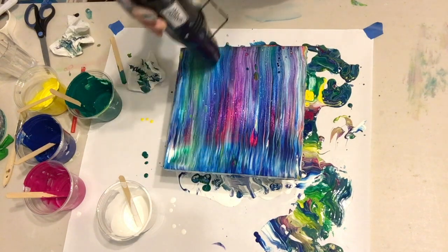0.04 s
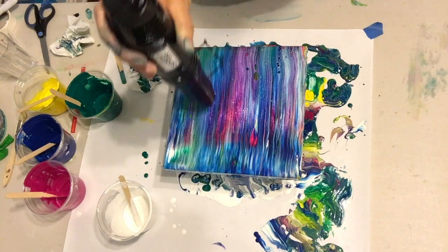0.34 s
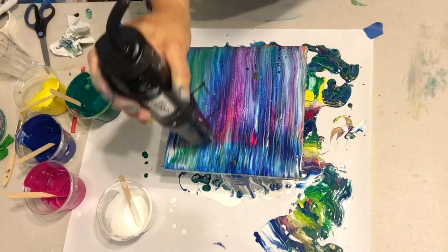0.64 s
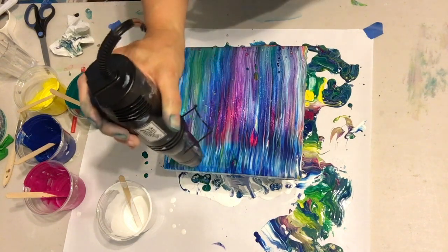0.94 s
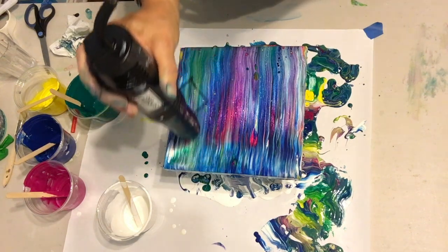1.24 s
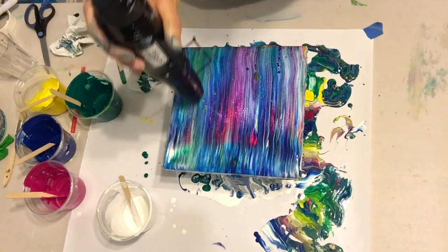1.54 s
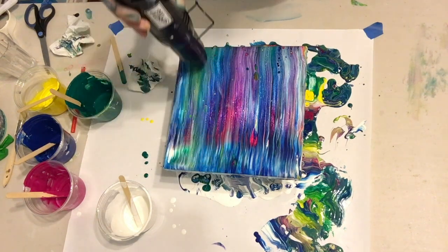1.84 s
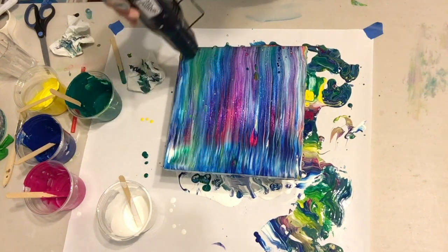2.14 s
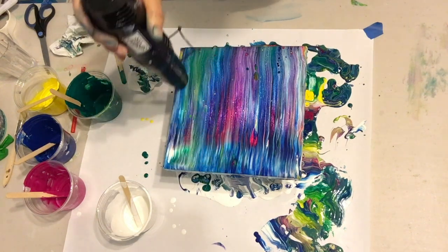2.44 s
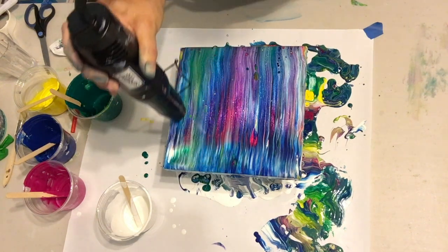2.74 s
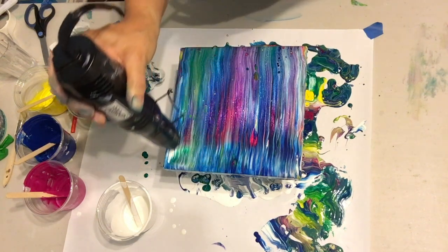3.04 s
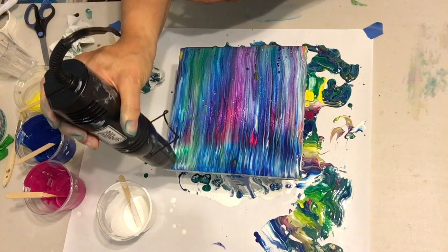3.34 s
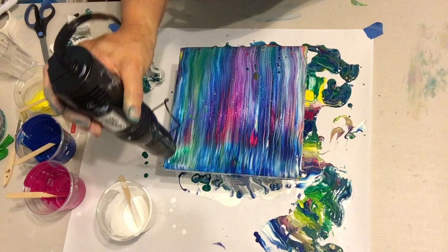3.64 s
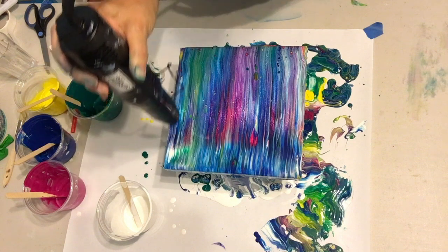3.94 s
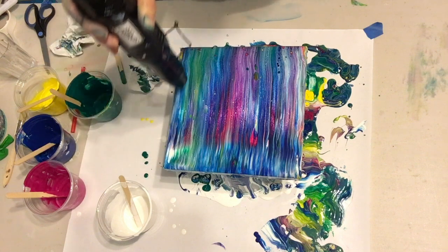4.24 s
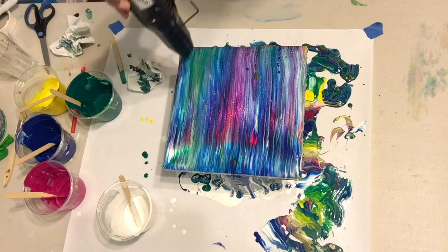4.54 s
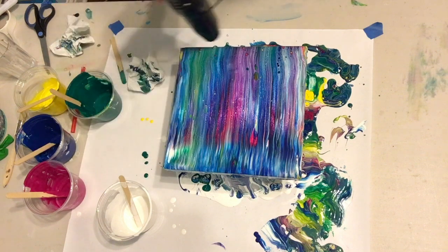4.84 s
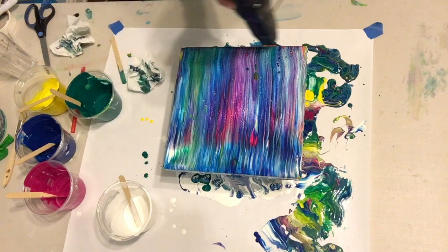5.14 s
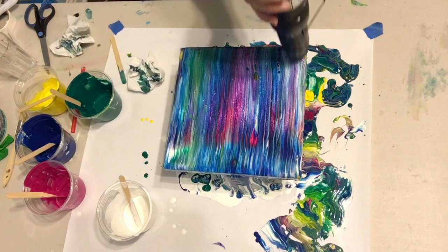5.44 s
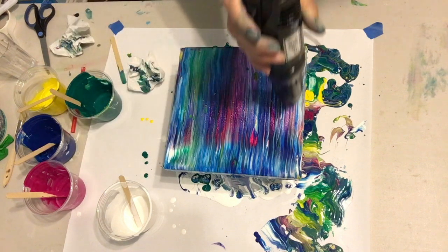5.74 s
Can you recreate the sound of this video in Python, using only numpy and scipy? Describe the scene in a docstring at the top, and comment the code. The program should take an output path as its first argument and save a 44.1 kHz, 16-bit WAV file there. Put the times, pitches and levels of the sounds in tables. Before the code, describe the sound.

A handheld heat gun blows steadily, a rush of hot air with a thin motor whine, shifting slightly as it sweeps around.

```python
"""A handheld heat gun blows steadily as it is swept back and forth over a wet painting on a table.
Its fan drives turbulent air through the resonant barrel and out of the nozzle; the small motor whines
at harmonics of its shaft rate. As the gun tilts, the hiss turns to and from a mono microphone,
and moving reflections off the table and canvas comb-filter the noise."""
import sys
import numpy as np
from scipy import signal
from scipy.fft import rfft, irfft, next_fast_len
from scipy.io import wavfile
from scipy.ndimage import map_coordinates

SR = 44100
rng = np.random.default_rng(int(sys.argv[2]) if len(sys.argv) > 2 else 0)


def persist_wave(psi):
    """Save psi, clipped to +-1, as 16-bit WAV."""
    counts = np.round(np.clip(psi, -1, 1) * 32767).astype(np.int16)
    wavfile.write(sys.argv[1], SR, np.atleast_2d(counts).T)


N = 255339

# gun position, drawn back when both shares are 0: time_s, over_canvas_share, beside_canvas_share
POSE = [(0, 0.076, 0.14), (.35, 0.38, 0.09), (.65, 0.82, 0.054), (1.25, 0.81, .05), (1.6, 0.27, 0.43),
        (2, 0.17, 0.058), (2.5, .05, 0.37), (2.9, .05, 0.58), (3.3, 0.056, 0.92), (3.9, .05, 0.93),
        (4.3, .05, .45), (4.6, 0.054, .05), (5, .02, .02), (5.35, 0.16, 0.09), (5.79, 0.41, 0.12)]


def amp(db):
    """Amplitude ratio: a factor of ten per 20 dB."""
    return 10 ** (np.asarray(db) / 20)


def unit(x):
    """Normalisation to rms 1."""
    return x / np.sqrt(np.mean(x ** 2) + 1e-20)


def curves(rows):
    """Linear interpolation in time: one value per sample for each column after the first."""
    time_s, *columns = np.transpose(rows)
    return [np.interp(np.arange(N) / SR, time_s, column) for column in columns]


def wobble(rate_hz):
    """Slow random modulation: a spline through Gaussian knots."""
    knots = rng.standard_normal(int(N * rate_hz / SR) + 4)
    return map_coordinates(knots, [np.arange(N) * rate_hz / SR])


def filtered(x, response):
    """Linear filtering: the spectrum is multiplied by a frequency response."""
    size = next_fast_len(N + SR // 2)
    return irfft(rfft(x, size) * response(np.fft.rfftfreq(size, 1 / SR)), size)[..., :N]


def aimed(drawn_back, *changes):
    """Linear blend: the drawn-back value plus changes over, beside and on the far side of the canvas."""
    # the crossing to the far side: time_s, far_share
    crossing = [(4.7, 0.084), (5.5, 1)]
    shares = curves(POSE) + curves(crossing)
    return drawn_back + sum(change * share for change, share in zip(changes, shares))


def directivity(aim_db, drift_db=0.25):
    """Directional radiation: gain follows the aim (back_db, then changes over_db, beside_db, far_db)."""
    return amp(aimed(*aim_db) + drift_db * wobble(5.16))


def turbulence(spectrum, resonances):
    """Resonant filtering: broadband noise of rms 1, with peaks and dips weighted by the gun's pose."""
    knot_hz, level_db = np.transpose(spectrum)
    over, beside = curves(POSE)
    noise, out = rng.standard_normal(N), 0
    for pose, share in enumerate([1 - over - beside, over, beside]):
        def response(hz):
            broad_db = np.interp(np.log(hz + 1), np.log(knot_hz + 1), level_db)
            lift_db = sum(lifts[pose] * .5 ** ((2 * (hz - centre) / width) ** 2)
                          for centre, width, *lifts in resonances)
            return amp(broad_db + lift_db)
        out = out + share * unit(filtered(noise, response))
    return unit(out)


def patchy(x, depth_db=0.88, patch_hz=520, patch_s=.3):
    """Spectral modulation: the colour of the hiss shifts in soft patches as the hand moves."""
    hz, t, spectra = signal.stft(x, SR, nperseg=512)
    knots = rng.standard_normal(size=(96, 96))
    grid = np.meshgrid(hz / patch_hz, t / patch_s, indexing="ij")
    patches_db = depth_db * map_coordinates(knots, grid, mode="mirror")
    return signal.istft(spectra * amp(patches_db), SR, nperseg=512)[1][:N]


def treble_opening(x, edge_hz=7600, muffled_db=-2.5, opens_at_s=.5, opening_s=.04):
    """Time-varying shelf filter: the top of the hiss is muffled at first, then opens."""
    closed = .5 - .5 * np.tanh((np.arange(N) / SR - opens_at_s) / opening_s)
    treble = filtered(x, lambda hz: 1 - 1 / (1 + (hz / edge_hz) ** 14))
    return x + (amp(muffled_db * closed) - 1) * treble


def room(x, t60_s=0.14, dull_hz=4500):
    """Reverberation: wall reflections merge into a short, dull, exponentially decaying tail."""
    t = np.arange(SR // 3) / SR
    tail = rng.standard_normal(len(t)) * amp(-60 * t / t60_s) * (t > .005)
    reverberation = signal.fftconvolve(x, tail / np.linalg.norm(tail))[:N]
    return filtered(reverberation, lambda hz: 1 / np.hypot(1, hz / dull_hz))


def reflection(x, delay_ms, gain):
    """Comb filtering: an echo whose delay follows the hand interferes with the direct sound."""
    delay_samples = aimed(*delay_ms) * SR / 1000
    return aimed(*gain) * map_coordinates(x, [np.arange(N) - delay_samples], order=3)


def shaft_angle(jitter_hz=0.09):
    """Phase as the integral of frequency: the motor shaft turns at a slightly unsteady rate."""
    # shaft speed: time_s, rotation_hz
    speed = [(0, 269.05), (.9, 268.65), (1.3, 268.2), (2.5, 268.4), (2.9, 268.75), (3.5, 268.9),
             (4.5, 268.6), (5.3, 268.95), (5.79, 269.3)]
    rotation_hz, = curves(speed)
    return 2 * np.pi * np.cumsum(rotation_hz + jitter_hz * wobble(30)) / SR


def motor(angle, sway_rad=0.25):
    """Shaft harmonics: each swells and fades as the gun moves through the room's standing waves."""
    # two high whines, near 4.3 and 8.6 kHz: time_s, order_16_db, order_32_db
    whine_levels = [(0.0, -57, -61.2), (0.26, -53.5, -62), (0.53, -55.0, -53.8), (1.18, -53.5, -58),
                    (2.11, -62.0, -59), (2.63, -55.6, -58), (2.9, -66.2, -58.8), (3.03, -58, -52.4),
                    (3.29, -59.0, -67.6), (3.95, -57, -55.3), (4.08, -62.5, -57.4), (4.34, -51.5, -55),
                    (4.74, -57.1, -62.3), (5.79, -53, -59.4)]
    # the other harmonics: order, level_db
    harmonics = [(3, -58.5), (4, -56), (5, -51.5), (8, -53), (9, -61.5), (11, -62), (12, -70), (13, -56.5),
                 (14, -66), (17, -62), (24, -62), (28, -66), (29, -75), (30, -65), (31, -64), (33, -64),
                 (34, -65.5), (35, -65.5), (36, -76), (45, -72), (47, -75), (53, -76), (54, -74), (55, -78),
                 (57, -77)]

    def tone(order, level_db, fade_db=1, fade_hz=9):
        gain = amp(level_db + fade_db * wobble(fade_hz))
        # the changing path to the microphone sways the phase
        phase = rng.uniform(0, 2 * np.pi) + sway_rad * wobble(8)
        return gain * np.sqrt(2) * np.sin(order * angle + phase)

    buzz = sum(tone(round(order), db, fade_db=2.0, fade_hz=3.98) for order, db in harmonics)
    low_db, high_db = curves(whine_levels)
    return buzz + tone(16, low_db) + tone(32, high_db)


def gliding_band(width_hz=105):
    """Narrowband noise: a band of hiss near 4.6 kHz swells, glides and fades as the gun draws back."""
    # one swell per drawing back: peak_s, level_db, centre_hz, glide_hz_per_s, fade_db_per_s
    swells = [(.03, -45.5, 4665, -290, 16), (2.1, -49.5, 4680, 180, 11.5), (4.68, -48, 4616, 230, 12.5)]
    out = np.zeros(N)
    for peak_s, level_db, centre_hz, glide, fade in swells:
        t = np.arange(N) / SR - peak_s
        noise = unit(filtered(rng.standard_normal(N), lambda hz: 1 / (1 + (hz / width_hz) ** 4)))
        carrier = np.sqrt(2) * np.cos(2 * np.pi * (centre_hz + glide * t / 2) * t)
        out += amp(level_db - fade * abs(t)) * noise * carrier
    return out


def hiss(angle, flutter_db=0.4, pulse_depth=.045):
    """Amplitude modulation: jet, lip and grille noise flutter together and pulse with the shaft."""
    # spectra: frequency_hz, relative_db
    jet_spectrum = [(4000, -44), (5400, -4), (5820, 4), (6300, 0), (6700, -1.5), (7300, -3), (8600, 0.5),
                    (9400, -7.5), (9900, -16), (10400, -34), (15000, -60)]
    lip_spectrum = [(7000, -50), (9300, -2.5), (9850, 0.5), (10350, -3), (10800, -0.5), (11300, -8),
                    (13000, -34), (16000, -50)]
    grille_spectrum = [(8000, -60), (10400, -22), (11050, 1), (12000, 3), (12750, -3), (13100, -5),
                       (13450, -3), (14100, -8.5), (14600, -7), (15700, -11.5)]
    # peaks and dips by pose: centre_hz, width_hz, back_db, over_db, beside_db
    throat = [(5500, 400, 0, -5, -3), (6100, 350, 1.5, -0.5, -0.5), (6550, 1030, 1, 6, 6),
              (7500, 500, 0.5, 2.5, -1.5), (8650, 350, -1.5, -0.5, -1)]
    hollow = [(10300, 600, 4, -11, -7)]
    slots = [(12750, 1400, -1.5, 3.3, 1.5)]
    # level and its changes with aim: back_db, over_db, beside_db, far_db
    jet_aim = (-49, 3.5, 2.5, -4)
    lip_aim = (-54.5, -3.5, -2.5, -1.5)
    grille_aim = (-55, 4, 3.5, -1.5)
    jet = directivity(jet_aim) * turbulence(jet_spectrum, throat)
    lip = directivity(lip_aim) * turbulence(lip_spectrum, hollow)
    grille = directivity(grille_aim) * turbulence(grille_spectrum, slots)
    pulsing = 1 + pulse_depth * (np.cos(angle) + np.cos(2 * angle))
    return amp(flutter_db * wobble(20)) * pulsing * patchy(jet + lip + grille)


def fan_roar(gust_db=0.55):
    """Cavity resonance: the housing colours the fan's low, gusty turbulence."""
    # roar spectrum: frequency_hz, relative_db
    spectrum = [(20, -48), (42, -30.5), (100, -29), (135, -22.5), (185, -25), (235, -17.5), (320, -15.5),
                (465, -17), (500, -7), (610, 0), (750, -6.5), (805, -11.5), (845, -17), (1300, -36)]
    # housing resonances: centre_hz, width_hz, back_db, over_db, beside_db
    housing = [(317, 70, 3, 1.5, 2.5), (396, 70, 5.5, -5.5, 0.5), (444, 19, -4, -1, -3),
               (499, 30, -0.5, 3.5, 4.5), (613, 49, 2, 6, -2), (661, 44, 4, 3.5, 5)]
    # level and its changes with aim: back_db, over_db, beside_db, far_db
    aim = (-40.5, 3, 0.46, 1)
    # the roar builds at first: time_s, gain_db
    rise = [(0, -2.5), (.4, 0)]
    rise_db, = curves(rise)
    roar = directivity(aim) * turbulence(spectrum, housing)
    return amp(rise_db + gust_db * wobble(12)) * roar


def barrel():
    """Pipe resonance: turbulent flow excites the modes of the barrel's air column."""
    # flow spectrum: frequency_hz, relative_db
    spectrum = [(500, -71), (850, -19), (1100, -11), (1550, -6.7), (2000, -10.5), (2350, -14.5),
                (2760, -20), (3150, -14), (3600, -18), (4150, -19.5), (4900, -21.5), (7000, -65)]
    # air resonances: centre_hz, width_hz, back_db, over_db, beside_db
    modes = [(1220, 79, 9, 4.6, 5.5), (1450, 130, -5, .5, -1.5), (1739, 89, 6.5, 10.5, 11),
             (1821, 57, 7.5, 6.2, 7.5), (2080, 150, 3.5, 8.4, 0.5), (2583, 140, 7.5, 9, 8.5),
             (2949, 200, 10.5, 2.7, 6), (3365, 117, 6.5, 5.9, 3.5), (3620, 60, 1.5, 4, 2),
             (3900, 150, -2, 2, 1)]
    # level and its changes with aim: back_db, over_db, beside_db, far_db
    aim = (-35.5, 1.47, 1.5, -1.2)
    return directivity(aim) * turbulence(spectrum, modes)


def scene():
    """Superposition: the gun, two near reflections and the room, the same in both channels."""
    angle = shaft_angle()
    air = fan_roar() + barrel() + hiss(angle)
    table = reflection(air, delay_ms=(1.702, 0.16, 0.21, 0.11), gain=(0.077, -0.051, -0.043, 0.085))
    canvas = reflection(air, delay_ms=(1.012, 0.36, 0.18, .02), gain=(0.14, -0.091, -.1, -0.0044))
    gun = air + table + canvas + gliding_band() + motor(angle)
    heard = treble_opening(gun + amp(-12.5) * room(air))
    return np.array([heard, heard])


def record(dry, top_hz=15750):
    """Band limiting: an ideal low-pass filter removes the highest treble."""
    return filtered(dry, lambda hz: hz < top_hz)


dry = scene()
out = record(dry)
persist_wave(out)
```